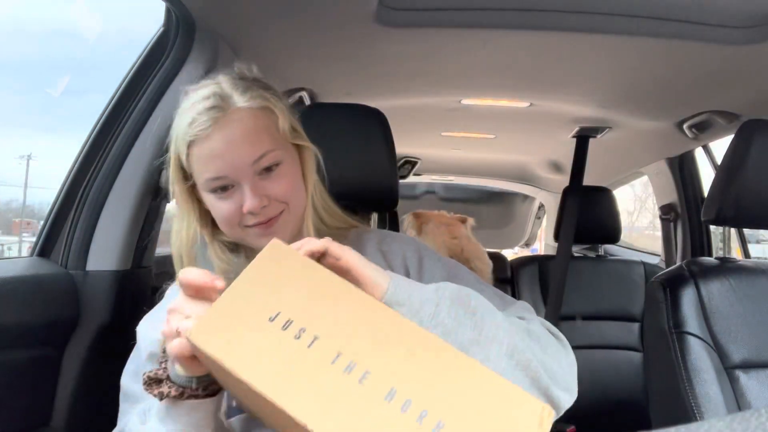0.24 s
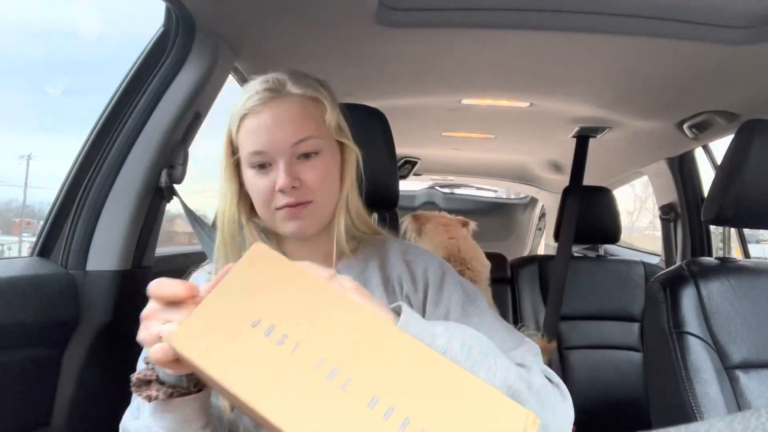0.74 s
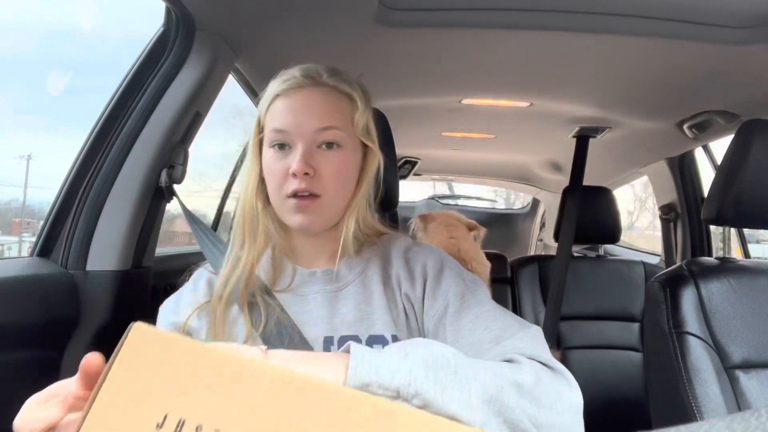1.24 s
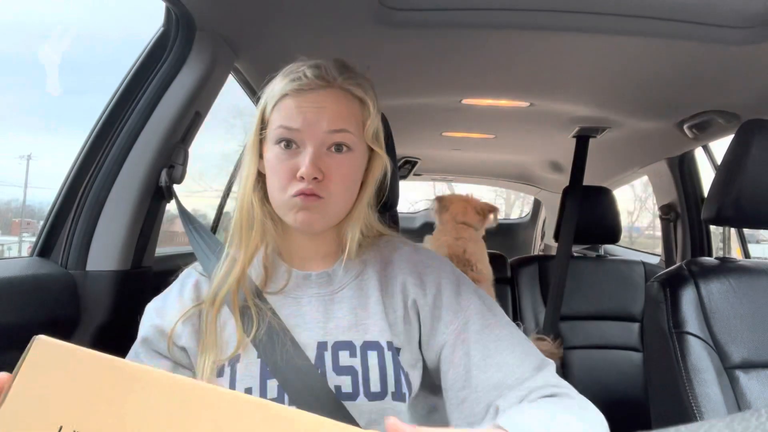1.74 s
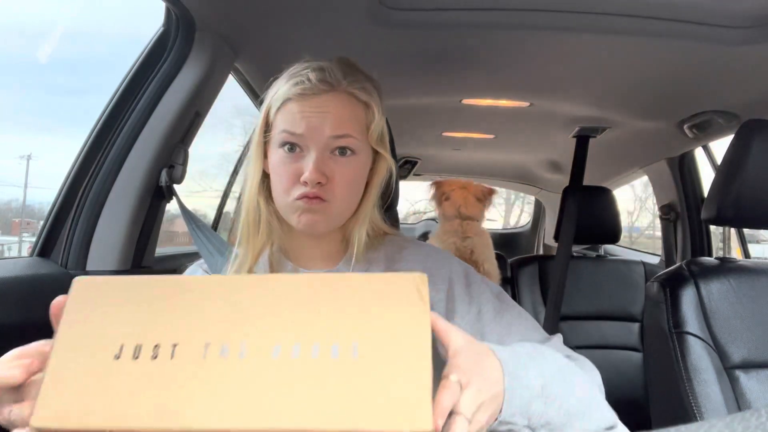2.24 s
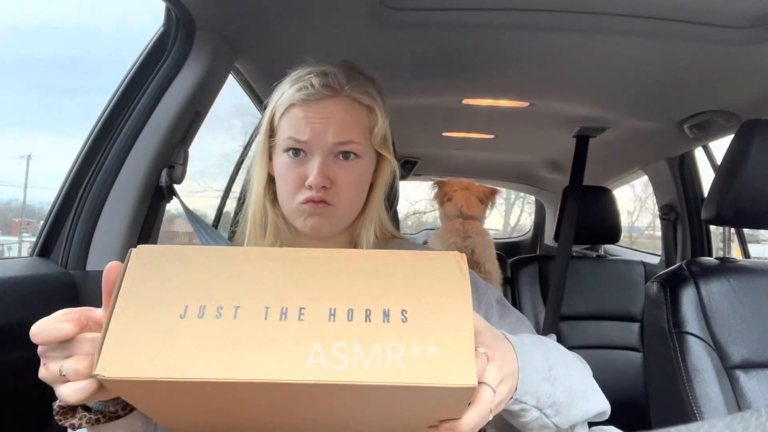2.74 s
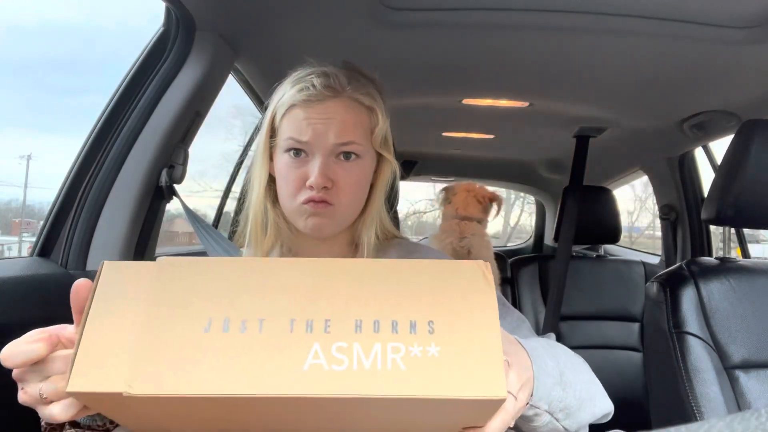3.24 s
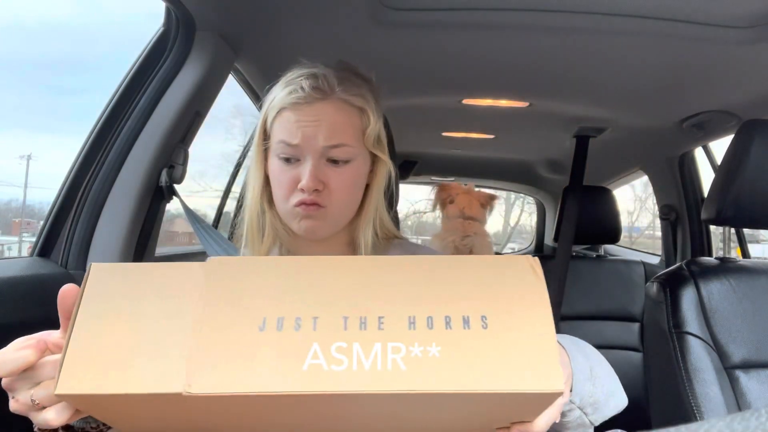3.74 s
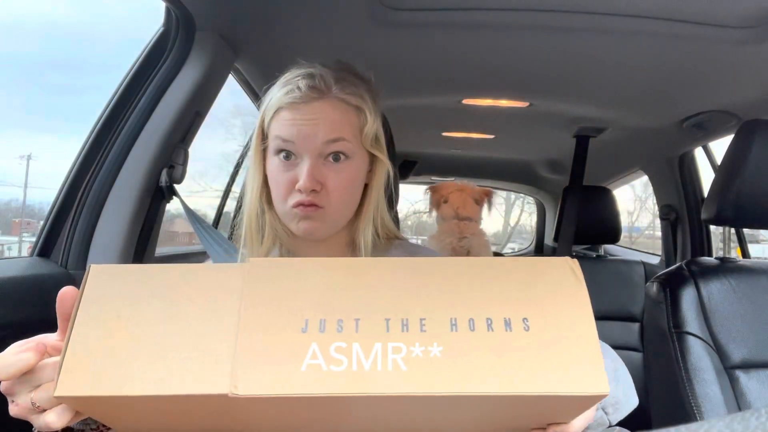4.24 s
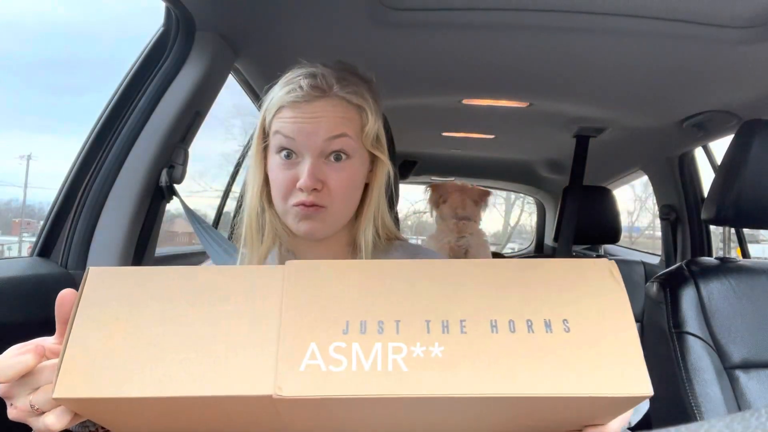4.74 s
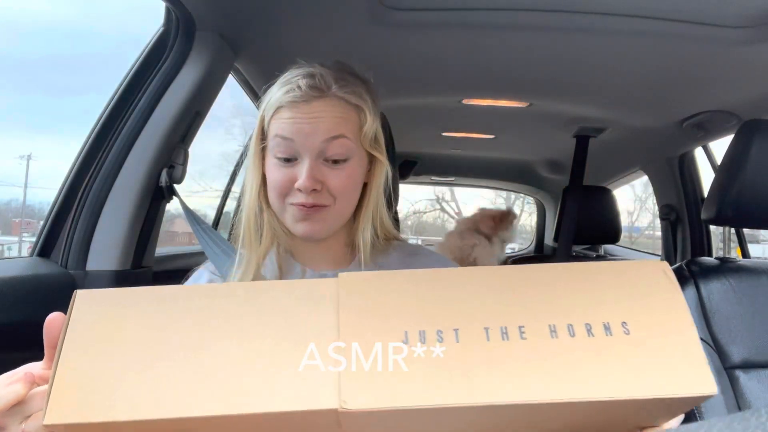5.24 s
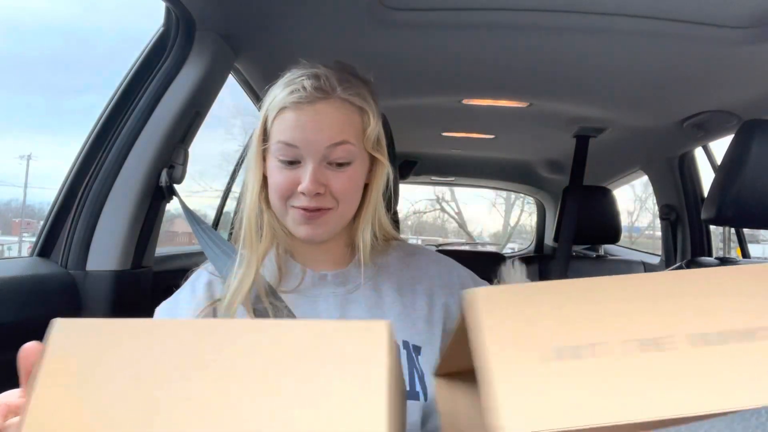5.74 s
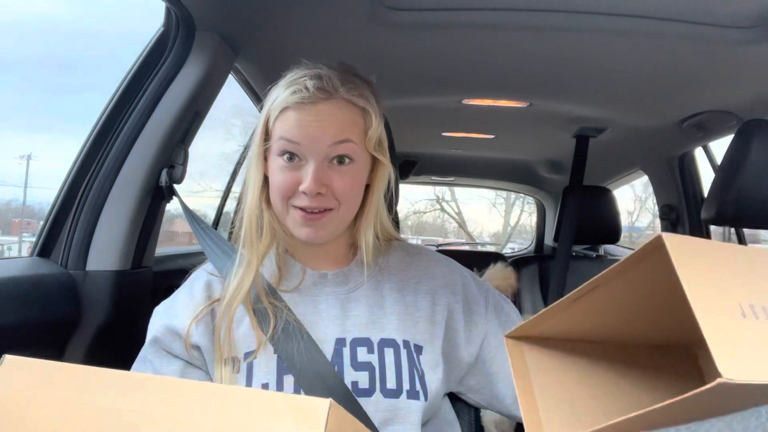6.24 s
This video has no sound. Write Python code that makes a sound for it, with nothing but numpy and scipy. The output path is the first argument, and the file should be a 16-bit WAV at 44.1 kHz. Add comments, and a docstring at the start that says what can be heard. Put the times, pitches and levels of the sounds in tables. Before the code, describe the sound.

A cardboard box is handled, then its tray slides slowly out of the sleeve with rasps and knocks, over a car's low idling hum.

```python
"""Inside a parked car, hands turn a cardboard shoe box, then slowly slide its tray out of the sleeve.
Rubbing and knocks make the card panels and the air in the box ring; the tray rasps as it breaks loose
and the sleeve squeaks as it lets go. Underneath, the vents hiss and the engine hums, its speed
swinging a little and stepping up near the end. A phone with two microphone openings listens."""
import sys
import numpy as np
from scipy import signal
from scipy.fft import rfft, irfft, next_fast_len
from scipy.io import wavfile

SR = 44100
rng = np.random.default_rng(int(sys.argv[2]) if len(sys.argv) > 2 else 0)


def file_out(sig):
    """Save sig as 16-bit WAV at sys.argv[1]."""
    # one column per channel
    cols = np.atleast_2d(sig).T
    # limit, then scale
    lim = np.clip(cols, -1, 1)
    pcm = np.round(lim * 32767).astype(np.int16)
    wavfile.write(sys.argv[1], SR, pcm)


N = 286278

# The notes the card panels ring with. Each row: pitch in Hz, width in Hz, relative level in dB.
PANELS = [(635, 109, 2), (800, 260, 1), (930.5, 170, 4.5), (1010, 145, 1.5), (1356, 136, -3),
          (1558, 32, -5.5), (1794, 168, -2), (2135, 177, -1), (2456, 293, -3), (2463, 51, -2.5)]
# The low notes of the air in the box. Each row: pitch in Hz, width in Hz, relative level in dB.
HOLLOW = [(231.7, 83, -2), (292.6, 78.7, -1), (361, 123, -4), (501, 128, -9.5)]
# The hiss of card on card. Each row: frequency in Hz, gain in dB.
CARD_HISS = [(1500, -27), (2800, 0.5), (4700, 0), (7000, -7), (9000, -19.5), (10500, -37.5)]
# The higher hiss of skin on card. Each row: frequency in Hz, gain in dB.
SKIN_HISS = [(7500, -23.5), (9500, -6.5), (12500, -6.5), (15800, -8)]


def amp(db):
    """Turns decibels into a factor to multiply by."""
    return 10 ** (np.asarray(db) / 20)


def evened(x):
    """Scales a signal to an average power of 1."""
    return x / np.sqrt(np.mean(x ** 2) + 1e-20)


def curves(rows):
    """Joins rows of (seconds, values..) with straight lines, one curve for each value."""
    times, *columns = np.transpose(rows)
    return [np.interp(np.arange(N) / SR, times, column) for column in columns]


def value_at(points, hz):
    """Looks up a frequency between rows of (Hz, value)."""
    known_hz, values = np.transpose(points)
    return np.interp(np.log(hz + 1), np.log(known_hz), values)


def colour(x, points, turn=1):
    """Filters x by rows of (Hz, dB); a complex turn shifts the phase."""
    size = next_fast_len(N + 4096)
    gain = amp(value_at(points, np.fft.rfftfreq(size, 1 / SR)))
    return irfft(rfft(x, size) * gain * turn, size)[..., :N]


def ring(x, modes, focus_hz=None, spread=1, octave=0, rest=1):
    """Makes x ring a set of notes, most strongly near focus_hz and, if asked, an octave above it."""
    poles = [(np.exp((2j * np.pi * hz - np.pi * width) / SR), (-1) ** k * amp(db))
             for k, (hz, width, db) in enumerate(modes)]
    def bank(drive, weights):
        return sum(signal.lfilter([g * (1 - abs(p)) * p.imag], [1, -2 * p.real, abs(p) ** 2], drive * w)
                   for (p, g), w in zip(poles, weights))
    weights = even = np.ones(len(modes))
    if focus_hz is not None:
        off = np.log([[mode[0]] for mode in modes]) - np.log(focus_hz)
        weights = rest + 1 / (1 + (off / spread) ** 2) + octave / (1 + ((off - np.log(2)) / spread) ** 2)
        weights /= np.sqrt(np.mean(weights ** 2, axis=0))
    return bank(x, weights) / np.linalg.norm(bank(signal.unit_impulse(8192), even))


def drift(rate_hz):
    """A random wander about 1 in size; a higher rate wanders faster."""
    return evened(signal.lfilter([1], [1, -np.exp(-2 * np.pi * rate_hz / SR)], rng.standard_normal(N)))


def cabin(x):
    """Short echoes in the car; the box moves, so one echo pattern keeps fading into the next."""
    # Each row: frequency in Hz, seconds to fade by 60 dB.
    fade_times = [(300, 0.046), (1500, 0.034), (6000, 0.043), (15000, 0.024)]
    patterns, lead_s = 4, .08
    echoes = np.zeros((patterns, 2, 4096))
    delays = np.arange(60, 4060, 20) + rng.integers(0, 20, (patterns, 2, 200))
    np.put_along_axis(echoes, delays, rng.choice([-1., 1.], delays.shape), 2)
    hz, t, bands = signal.stft(echoes, SR, nperseg=128)
    tails = signal.istft(bands * amp(-60 * t / value_at(fade_times, hz)[:, None]), SR, nperseg=128)[1]
    tails /= np.linalg.norm(tails, axis=2, keepdims=True)
    place = np.arange(N) / SR / lead_s - np.arange(patterns)[:, None, None]
    blend = np.cos(np.pi / 2 * np.clip((place + patterns / 2) % patterns - patterns / 2, -1, 1))
    return signal.oaconvolve(x * blend, tails, axes=2).sum(0)[:, :N]


def vents():
    """Air from the vents makes a thin, nearly steady noise."""
    # Each row: frequency in Hz, gain in dB.
    air_tone = [(300, -25), (500, -1.5), (1900, -1), (2900, -10.5), (6600, -22.5), (15800, -41.5)]
    return amp(-67 + 1.8 * drift(4.8)) * evened(colour(rng.standard_normal((2, N)), air_tone))


def engine_speed():
    """Engine cycles per second: a slow swing around idle, then a smooth step up."""
    t = np.arange(N) / SR
    idle_hz, step_hz, step_at_s = 7.59, 3.0, 5.17
    up = 1 / (1 + np.exp((step_at_s - t) / .1))
    swing = -.18 * np.cos(2 * np.pi * (t - 1.06) / 1.18)
    opening_dip = .3 * np.exp(-t / .22)
    overshoot = .2 * np.exp(-((t - 5.66) / .2) ** 2)
    return idle_hz + (1 - up) * (swing - opening_dip) + step_hz * up + overshoot


def engine():
    """The engine hums at whole multiples of its cycle rate (harmonics), over a noisy rumble."""
    # Each row: harmonic number, base level at slow idle in dB, base level at fast idle in dB.
    harmonics = [(4, -69, -48), (5, -54, -35), (6, -52, -52), (7, -49, -47), (8, -34, -39), (9, -50, -50),
                 (10, -52, -41), (11, -42, -39), (12, -49, -46), (13, -41, -38), (14, -40, -51),
                 (15, -46, -55), (16, -33, -47), (17, -46, -54), (18, -40, -48), (19, -45, -50),
                 (20, -53, -52), (21, -56, -50), (22, -52, -46), (23, -57, -48), (24, -45, -55),
                 (25, -54, -50), (26, -51, -64), (27, -46, -66), (28, -43, -67), (29, -45, -79),
                 (30, -49, -70), (31, -38, -69), (32, -49, -62), (33, -54, -56.5), (34, -60, -65),
                 (35, -57, -76), (36, -61, -70), (37, -70, -73), (40, -72, -70), (41, -72, -70),
                 (42, -72, -72)]
    # The two strongest. Each row: time in seconds, base level of harmonic 8 in dB, of harmonic 16 in dB.
    boom_levels = [(0.1, -23, -31.5), (0.6, -30, -37), (1.1, -28, -36.5), (1.5, -33.5, -36),
                   (2.0, -36, -38), (2.35, -31.5, -44), (2.8, -47, -31), (3.4, -43, -37.5),
                   (3.75, -30, -27), (4.2, -41, -28.5), (4.6, -31.5, -36), (5.0, -37, -25),
                   (5.2, -32, -27.5), (5.6, -38, -54.5), (6.0, -41, -43)]
    # Each row: frequency in Hz, gain in dB.
    rumble_tone = [(25, -34), (45, 5.5), (120, 10.5), (240, -2), (320, -8), (460, -27), (520, -58.5)]
    step = 16  # the hum is low, so every 16th sample is enough
    hz = engine_speed()
    eighth_db, sixteenth_db = curves(boom_levels)
    held_close = curves([(2.62, 0), (2.82, 1), (5.2, 1), (5.4, 0)])[0]  # 1 while the box is held close
    fast = np.clip((hz - 7.8) / (10.5 - 7.8), 0, 1)  # 0 at slow idle, 1 at fast idle
    cycles = (np.cumsum(hz) / SR)[::step]
    t, hum = np.arange(0, N, step) / SR, 0
    throb_phase = rng.random() + np.cumsum(rng.standard_normal(len(t))) * 0.0026
    for (k, slow_db, fast_db), (phase, pace, offset) in zip(harmonics, rng.random((len(harmonics), 3))):
        db = slow_db + fast * (fast_db - slow_db) - 10 * held_close * (k > 20)
        db = {8: eighth_db, 16: sixteenth_db}.get(k, db)
        if k < 16 and k != 8:  # louder while the engine pulls up to speed
            db = db + 20 * fast * (1 - fast)
        if k in (13, 14, 17, 18):  # these swell with harmonic 16 and make the hum throb
            db = db + .7 * (sixteenth_db + 34) * held_close * (1 - fast) ** 4 - 2 * (1 - fast)
        waver_db = 2.3 * np.sin(2 * np.pi * ((0.572 + 1.123 * pace) * t + offset))
        phase = phase + np.cumsum(rng.standard_normal(len(t))) * 0.001147 * np.sqrt(k)  # uneven firing
        if 11 <= k <= 19:  # locked in step: one strong and one weak beat each cycle
            phase = throb_phase - k * .315 + .5 * (k in (11, 13))
        hum += np.sqrt(2) * amp(db[::step] + waver_db) * np.sin(2 * np.pi * (k * cycles + phase))
    rumble = amp(-41.5 - 1.1 * fast) * evened(colour(rng.standard_normal(N), rumble_tone))
    return signal.resample_poly(hum, step, 1)[:N] + rumble


def thumps():
    """The box jerks with soft thumps, each a brief swell of one low tone."""
    # Each row: middle in seconds, level in dB, pitch in Hz, length in seconds.
    jerks = [(1.88, -23.5, 165, 0.039), (2.954, -21, 169, 0.023), (3.761, -14, 187, 0.015),
             (3.777, -12.5, 49, 0.096), (3.836, -11, 49.07, 0.084), (4.692, -29, 58.8, 0.13),
             (4.773, -24.5, 49.8, 0.089), (5.55, -23, 114, 0.062), (5.643, -27.5, 125.4, 0.08),
             (5.69, -22, 85.4, 0.12)]
    t, out = np.arange(N) / SR, np.zeros(N)
    for (middle, db, hz, length), phase in zip(jerks, rng.random(len(jerks))):
        swell = np.cos(np.pi * np.clip((t - middle) / length, -.5, .5))
        out += amp(db) * swell * np.sin(2 * np.pi * (hz * t + phase))
    return out


def ticks():
    """Fingernails and paper edges make tiny bursts of bright noise."""
    # Each row: start in seconds, relative level in dB.
    touches = [(0.9945, -44), (1.1915, -53), (3.898, -52), (6.231, -63)]
    bursts, t = np.zeros(N), np.arange(400) / SR
    for (start, db), noise in zip(touches, rng.standard_normal((len(touches), len(t)))):
        bursts[round(start * SR):][:len(t)] += amp(db + 2 - 60 * t / 0.012) * noise
    return colour(bursts, SKIN_HISS)


def squeak():
    """The sleeve sings one short, husky note as it lets go."""
    t = np.arange(N) / SR
    start, end, hz = 5.545, 5.6, 452
    husk = 1 + 0.32 * drift(90)
    swell = np.clip(np.minimum(t - start, end - t) / 0.014, 0, 1)
    return amp(-29) * husk * swell * np.sin(2 * np.pi * hz * t)


def rasp():
    """The tray breaks loose: uneven slips ring two close notes that start fast and fade slowly."""
    # Each row: pitch in Hz, width in Hz, relative level in dB.
    notes = [(1150, 150, -2), (1360, 220, 0.5)]
    t, start, end = np.arange(N) / SR, 2.86, 3.04
    swell = np.clip(np.minimum((t - start) / 0.018, (end - t) / 0.093), 0, 1)
    slips = rng.standard_normal((2, N)) * amp(1.2 * drift(60))
    return ring(amp(-38.5) * swell * slips, notes)


def knocks():
    """A sharp blow pings one panel, then a rattle dies away in the panels, surface and air inside."""
    # Each row: start in seconds, relative levels in dB of panels, card snap, skin snap and hollow,
    # seconds to fade by 60 dB, favoured panel pitch in Hz, favoured hollow pitch in Hz.
    hits = [(0.268, -50, -56.5, -72, -39, 0.089, 1110, 293),
            (0.303, -38.5, -57.5, -68, -46, 0.042, 825, 337), (0.545, -44, -65, -83, -42, 0.063, 810, 327),
            (0.969, -46, -56, -82, -42, 0.03, 1010, 328), (1.056, -37, -48.5, -60, -32.5, 0.15, 1640, 298),
            (1.107, -33, -44.5, -71, -41, 0.063, 1310, 300),
            (1.123, -33.5, -53, -73, -42, 0.065, 2120, 332),
            (1.217, -37, -50.5, -57, -58, 0.013, 1390, 330), (1.357, -54, -55, -80, -44, 0.017, 786, 308),
            (1.403, -45, -55, -63, -39, 0.017, 660, 312), (1.552, -37.5, -59, -65, -34.5, 0.022, 1110, 310),
            (1.626, -41.5, -55, -72, -41, 0.2, 2180, 316), (1.755, -40, -52, -75, -54, 0.062, 980, 335),
            (1.848, -33, -54, -72, -40, 0.071, 1300, 360), (1.854, -29, -42, -50, -32, 0.038, 884, 360),
            (1.869, -42.5, -51, -62, -54, 0.022, 2150, 330), (1.875, -39, -50, -70, -29.5, 0.05, 800, 253),
            (1.993, -43.5, -62, -78, -48, 0.037, 1920, 333), (2.03, -48.5, -62, -78, -55, 0.041, 1800, 335),
            (2.125, -49, -55.5, -70, -45, 0.062, 1850, 336), (2.193, -52, -64, -76, -53, 0.03, 1820, 334),
            (2.404, -30, -42, -69, -39.5, 0.019, 1140, 330), (2.626, -49, -59, -76, -61, 0.028, 1360, 324),
            (3.72, -20.5, -37.5, -52.5, -22.5, 0.073, 920, 305),
            (3.728, -26, -44, -61, -22, 0.12, 1770, 260.6), (3.899, -60, -51, -64, -65, 0.05, 859, 290),
            (3.974, -52, -45, -65, -60, 0.017, 2100, 290), (4.011, -42.5, -53, -75, -61, 0.034, 1080, 290),
            (4.435, -44.5, -56, -72, -60, 0.034, 1820, 290), (4.514, -41.5, -57, -80, -57, 0.15, 750, 290),
            (4.629, -44, -61, -76, -51, 0.068, 1860, 290), (4.678, -27, -42.5, -52, -34, 0.13, 808, 275),
            (5.162, -58, -45.5, -60, -43, 0.29, 1880, 286), (5.288, -60, -38, -66, -37.5, 0.08, 1940, 290),
            (5.499, -44, -60, -72, -36.5, 0.03, 600, 497), (5.515, -22, -36, -59, -33.5, 0.05, 1250, 292),
            (5.521, -35.5, -39, -60, -34, 0.063, 1780, 293), (5.645, -37.5, -48, -61, -32, 0.18, 2520, 286),
            (5.666, -33.5, -62, -72, -46, 0.038, 1310, 272), (5.737, -53, -58, -79, -60, 0.047, 1850, 318),
            (5.862, -44.5, -59, -78, -63, 0.017, 1360, 326), (5.896, -42.5, -53, -69, -49, 0.07, 1360, 333),
            (5.955, -54, -70, -80, -60, 0.02, 1800, 330), (5.98, -42.5, -60, -76, -51, 0.16, 914, 330),
            (5.988, -45, -52.5, -68, -67, 0.11, 1270, 330), (6.029, -54, -65, -80, -60, 0.06, 805, 330),
            (6.172, -50, -79, -94, -48, 0.089, 610, 430), (6.369, -48.5, -73, -89, -57.5, 0.052, 780, 336)]
    drives, favoured_hz, t = np.zeros((5, N)), np.ones((2, N)), np.arange(6000) / SR
    blow = 5.2 * np.exp(-(t / .00003 - 2) ** 2)
    onset = np.minimum(t / 0.0025, 1)
    quick_fade = amp(-60 * t / 0.047) * onset
    shudder = amp(-7 - 404 * abs(t - 0.026)) * onset  # the hollow swells just after the blow
    for start, panel_db, *other_db, fade_s, panel_hz, hollow_hz in hits:
        grit, rattle = rng.standard_normal((2, len(t)))
        fade = amp(-60 * t / fade_s) * onset
        crack = blow + (fade + .5 * quick_fade) * grit
        layers = [blow + 0.51 * quick_fade * grit, fade * rattle, crack, crack, crack + shudder * rattle]
        at = round(start * SR)
        drives[:, at:at + len(t)] += (amp([panel_db, panel_db, *other_db])[:, None] * layers)[:, :N - at]
        favoured_hz[:, at:] = [[panel_hz], [hollow_hz]]
    to_ping, to_rattle, to_card, to_skin, to_hollow = drives
    ping = ring(to_ping, PANELS, favoured_hz[0], spread=.09, octave=.6, rest=.15)
    held_panels = [(hz, width * 1.22, db) for hz, width, db in PANELS]  # hands shorten the ringing
    muffled = ring(to_rattle, held_panels, favoured_hz[0], spread=0.76, rest=0.8)
    snap = colour(to_card, CARD_HISS) + colour(to_skin, SKIN_HISS)
    hollow = ring(to_hollow, HOLLOW, favoured_hz[1], spread=.12, rest=.2)
    return amp(-2.5) * (ping + muffled) + amp(7) * snap + amp(-1) * hollow


def contact():
    """How strongly grip, slide and strokes stir card hiss, skin hiss, panels and hollow; also a pitch."""
    # The tray's one long pull. Each row: time in seconds, relative levels in dB of card hiss and
    # panels, favoured pitch in Hz.
    slide = [(2.83, -104, -82, 1280), (2.885, -50, -41.5, 1350), (2.97, -39.5, -36.5, 1490),
             (3.135, -56, -45, 1300), (3.24, -50.5, -42.5, 1260), (3.5, -49, -40, 1250),
             (3.61, -51.5, -45, 1170), (3.8, -54.5, -44.5, 1135), (4.0, -56, -48, 1210),
             (4.3, -59, -50.5, 1380), (4.65, -55.5, -49, 1140), (4.75, -53, -45.5, 1150),
             (5.1, -53, -45, 1400), (5.24, -49.5, -44, 1420), (5.33, -53.5, -40.5, 1370),
             (5.385, -42.5, -38.5, 1470), (5.5, -41, -38, 1460), (5.62, -48, -41, 1370),
             (5.672, -56, -43, 1270), (5.7, -66, -72, 1300)]
    # Hands brush the box. Each row: start and length in seconds, relative levels in dB of card hiss,
    # panels and skin hiss, favoured pitch in Hz.
    strokes = [(0.0, 0.13, -59, -50, -68.5, 705), (0.226, .17, -67, -54.5, -76, 945),
               (0.485, 0.34, -67.5, -58.5, -79, 980), (0.707, 0.18, -54.5, -53.5, -67.5, 1510),
               (0.962, 0.19, -62.5, -48.5, -76, 910), (1.052, 0.19, -59, -51, -67.5, 1060),
               (1.108, 0.045, -46, -39.5, -60, 1210), (1.427, 0.17, -49, -47.5, -57.5, 2090),
               (1.599, 0.074, -52, -51, -58, 2180), (1.688, 0.23, -59.5, -53, -64.5, 1350),
               (1.9, 0.35, -68, -58, -76, 1410), (2.395, 0.038, -64.5, -51, -79, 1610),
               (2.543, 0.042, -69, -62, -79, 1700), (2.643, 0.042, -66.5, -71, -79, 1390),
               (2.742, 0.038, -63, -55, -73, 1200), (5.084, 0.024, -48.5, -39.5, -61, 1740),
               (5.186, 0.032, -50, -42.5, -63, 1690), (5.272, 0.029, -41, -41.5, -52, 1390),
               (5.537, 0.02, -54, -40, -53, 1440), (5.562, 0.015, -56, -37, -59, 2000),
               (5.656, 0.29, -63.5, -60.5, -76, 1300), (5.97, 0.14, -61.5, -54, -76, 1270),
               (6.237, 0.01, -67.5, -61, -79, 2200)]
    t = np.arange(N) / SR
    grip_hz, let_go_s = 1210, 5.51
    release_db = -31.5 * np.maximum(t - let_go_s, 0)
    grip_card, grip_panel, grip_hollow = (amp(db + release_db) ** 2 for db in (-74, -56.5, -53.5))
    sliding = (t > slide[0][0]) & (t < slide[-1][0])
    *slide_db, slide_hz = curves(slide)
    card, panel = sliding * amp(slide_db) ** 2
    skin = card * amp(-13.5) ** 2
    hollow = panel * amp(2 - 2 * (t - slide[0][0])) ** 2  # weaker as the box opens
    power = np.array([card + grip_card, skin, panel + grip_panel, hollow + grip_hollow])
    pitch_sum = panel * np.log(slide_hz) + grip_panel * np.log(grip_hz)  # louder touches count for more
    rise_db_per_s, fall_db_per_s = 347.5, 447.5
    for start, length, card_db, panel_db, skin_db, hz in strokes:
        near = slice(max(round((start - .2) * SR), 0), round((start + length + .2) * SR))
        age = t[near] - start
        fade_db = -np.maximum(np.maximum(-rise_db_per_s * age, fall_db_per_s * (age - length)), 0)
        fade_db -= 3.5 * np.clip(2 * age / length - 1, -1, 1) ** 2  # softer at both ends
        stroke = amp([[card_db], [skin_db], [panel_db]] + fade_db * [[1], [1.8], [.8]]) ** 2
        power[:3, near] += stroke
        pitch_sum[near] += stroke[2] * np.log(hz)
    return *np.sqrt(power), np.exp(pitch_sum / power[2])


def rub():
    """Paper fibres catch and slip: grainy noise hisses and shakes the panels and the air inside."""
    card_gain, skin_gain, panel_gain, hollow_gain, focus_hz = contact()
    grains_per_s, hollow_hz = 2500, 252
    grain_size = amp(2.3 * np.minimum(rng.exponential(1, N), 5)) * (rng.random(N) < grains_per_s / SR)
    noise, grains = rng.standard_normal((2, 2, 2, N))
    flicker = amp(0.65 * drift(5.2) + 0.78 * drift(100))
    slip, skim = evened(noise + 0.67 * evened(grain_size * grains)) * flicker
    hiss = evened(colour(skim, CARD_HISS)) * card_gain + evened(colour(slip, SKIN_HISS)) * skin_gain
    panels = ring(slip * panel_gain, PANELS, focus_hz * amp(1.76 * drift(3.5)), spread=0.46, rest=0.41)
    hollow = ring(slip * hollow_gain, HOLLOW, hollow_hz, spread=0.54, rest=0.19)
    return panels + hollow + hiss


def scene():
    """Row 0 is the sound that meets the phone head on, row 1 what crosses it sideways."""
    blows = knocks() + ticks()
    steady = rub() + vents() + squeak() + rasp()
    head_on = amp(-1) * blows + engine() + thumps()
    direct = amp(-1.5) * steady + np.array([head_on, np.zeros(N)])
    return direct + cabin(amp(-9) * steady + amp([[-10], [-1.5]]) * blows)


def record(dry):
    """The phone makes left and right from the sum and difference of its two microphone openings."""
    # Added together, the openings cancel near 9 kHz. Each row: frequency in Hz, gain in dB.
    sum_tone = [(7300, 0), (8100, -4.5), (8500, -32.5), (9800, -25), (10300, 4), (10800, 8)]
    # Their difference holds no bass. Each row: frequency in Hz, gain in dB.
    difference_tone = [(250, -69.5), (340, -39.5), (450, -14.5), (800, -3.5), (1400, -10), (2800, -1),
                       (4100, -9), (6000, -2), (10600, 15.5), (12300, 0), (13300, -24), (15500, -26.5)]
    leak, top_hz = .55, 15780
    both = colour(dry[0], sum_tone)
    # Head-on sound reaches one opening first, so it leaks into the difference a quarter cycle ahead.
    across = leak * colour(dry[0], difference_tone, turn=1j)
    across += np.sqrt(1 - leak ** 2) * colour(dry[1], difference_tone)
    treble_cut = signal.firwin(1023, top_hz, window=("kaiser", 9), fs=SR)
    return signal.oaconvolve(np.array([both + across, both - across]), treble_cut[None], "same")


dry = scene()
out = record(dry)
file_out(out)
```